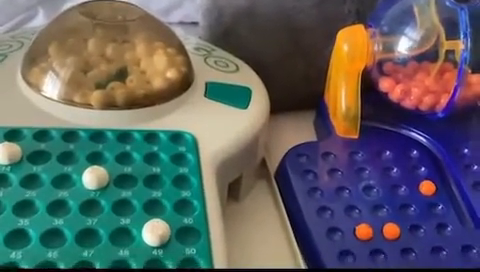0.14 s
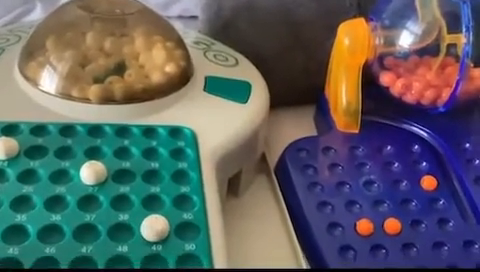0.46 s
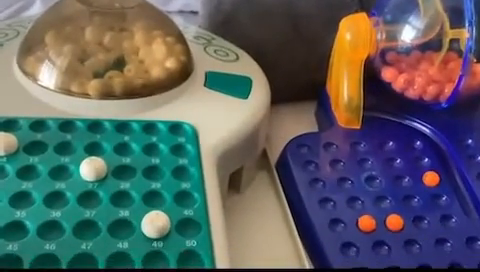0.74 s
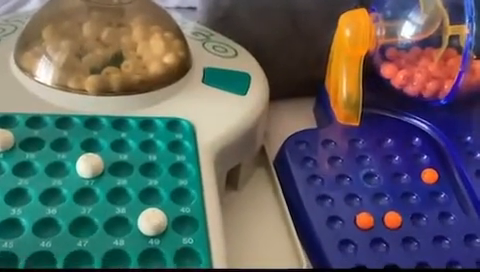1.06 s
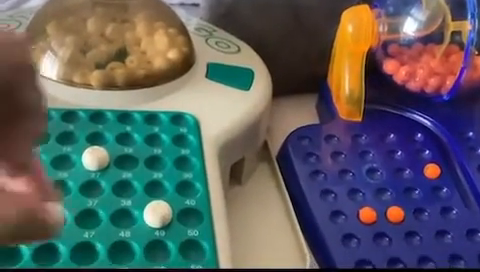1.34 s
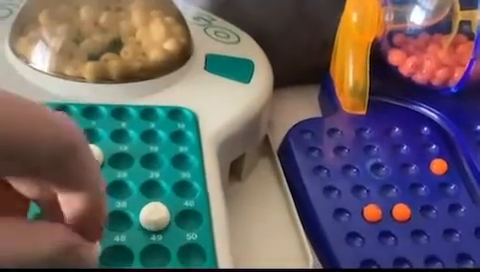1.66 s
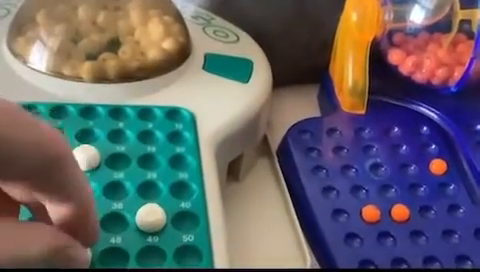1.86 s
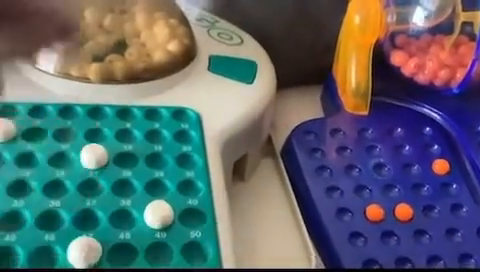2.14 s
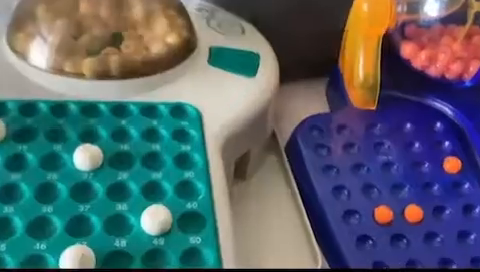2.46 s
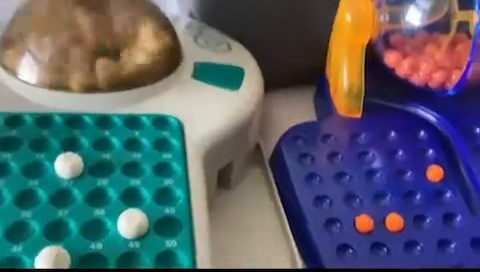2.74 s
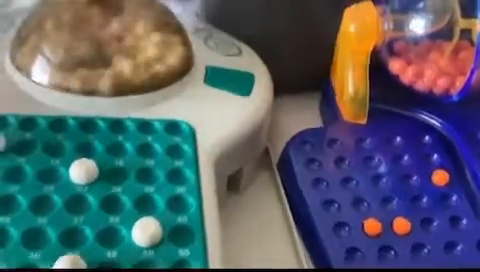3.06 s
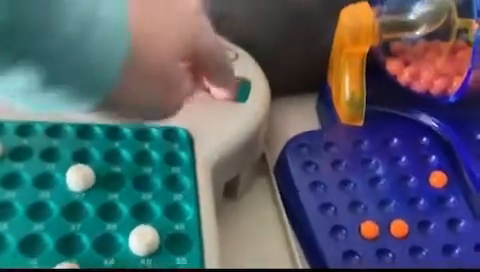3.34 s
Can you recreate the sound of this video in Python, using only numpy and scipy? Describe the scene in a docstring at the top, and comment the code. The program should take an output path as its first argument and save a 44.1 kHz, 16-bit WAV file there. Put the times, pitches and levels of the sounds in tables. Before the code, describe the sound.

A toy bingo machine's balls burst into a clattering rattle, following soft knocks and a dull tap

```python
"""A small room, the microphone close to a table with a plastic toy bingo machine on it.
Its mechanism knocks five times, a hand presses a ball into the tray, then the spring mixer snaps and
throws the balls round their dome. They rattle, settle, and the hand bumps the housing again.
Blows are bursts of damped noise, ringing modes and gliding thuds; random showers of them make the rattle.
Handling is shaped noise, and a short room echo and faint still air lie behind it all."""
import sys
import numpy as np
from scipy import signal
from scipy.fft import rfft, irfft
from scipy.io import wavfile

SR = 44100
rng = np.random.default_rng(int(sys.argv[2]) if len(sys.argv) > 2 else 0)


def wrap_up_sound(samples):
    """Save the sound to the file named by the first command line argument, as 16-bit audio."""
    columns = np.atleast_2d(samples).T
    # keep every value between -1 and 1, then stretch to whole-number steps
    tamed = np.clip(columns, -1, 1)
    steps = np.round(tamed * 32767).astype(np.int16)
    wavfile.write(sys.argv[1], SR, steps)


N = 154350  # 3.5 s
BLOW_SIZE = 12288  # samples in one blow
LEVEL_WINDOW_S = 0.01  # a blow's level is its RMS level as if spread over this time
BALL_DAMPING = 0.26  # how much sooner the highs die: exponent of decay time against frequency


# the mixer's spring lets go and chatters against its stop: (time [s], level of the crack [dB])
SPRING_BLOWS = [(2.6935, -19), (2.697, -13.5), (2.6994, -14.5), (2.706, -19.5)]
# colour of the spring's crack: (frequency [Hz], gain [dB])
SPRING_COLOUR = [(200, 3), (450, 1), (720, -8.5), (1100, 15), (1580, -13.5), (1900, -3.5), (2900, 1),
                 (4400, -5.5), (5200, -17), (7000, -17), (8500, -26.5), (15500, -35.5)]
# modes of the dome: (frequency [Hz], level [dB], decay time T60 [s])
DOME_MODES = [(290, -11, 0.27), (356.7, -4, 0.2), (428.3, -2.5, 0.1), (560.4, 0.5, .11), (1001, 1, 0.075),
              (1084, 1.5, 0.096), (1177, 1, 0.092), (1283, -6.5, 0.066), (1875, -11, 0.14),
              (2620, -13.5, 0.08), (2810, -6.5, 0.046), (3166, -10.5, 0.071), (3894, -10, 0.04)]


def snap():
    """The released mixer slams home in a few quick blows that ring the dome."""
    out = np.zeros(N)
    for time_s, level_db in SPRING_BLOWS:
        blow = crack(SPRING_COLOUR, t60_s=0.032, damping=BALL_DAMPING)
        dome = undb(-9) * ring(DOME_MODES, scatter_db=2.5)
        add(out, time_s, undb(level_db) * (blow + dome))
    return out


# colour of a ball's crack on plastic: (frequency [Hz], gain [dB])
BALL_COLOUR = [(120, -10), (220, 3.5), (380, 6), (580, 1), (760, -4.5), (1100, 9.5), (1330, -1.5),
               (1600, -15), (2050, -8.5), (3100, -7.5), (4300, -16.5), (5200, -25), (7000, -34.5),
               (8300, -45), (15500, -56)]


def ball_hit(tilt_db=0):
    """One ball on the dome: a crack, and modes whose pitch and mix depend on the spot struck."""
    pitch = 1 + 0.035 * rng.standard_normal()
    dome = ring(tilted(DOME_MODES, tilt_db), pitch, scatter_db=2)
    blow = crack(tilted(BALL_COLOUR, tilt_db), t60_s=0.035, damping=BALL_DAMPING)
    return unit(blow + undb(-4.5) * dome)


# tumbling of the loose balls: (time [s], level [dB])
TUMBLE_LEVEL = [(2.54, -46), (2.56, -41.5), (2.63, -47.5), (2.68, -38), (2.715, -22.5), (2.76, -27),
                (2.8, -20.5), (2.845, -18.5), (2.91, -24), (2.99, -31), (3.02, -27.5), (3.1, -35.5),
                (3.14, -48), (3.22, -52), (3.3, -57), (3.36, -48), (3.41, -58), (3.5, -61)]


def rattle(spots=24, hits_per_s=950):
    """A shower of random hits on many spots of the dome, swelling and dying as the balls settle."""
    out = np.zeros(N)
    for tilt_db in np.linspace(-1.2, 1.2, spots):  # dull to bright spots, dB per octave
        hits = shower(TUMBLE_LEVEL, hits_per_s / spots)
        out += signal.oaconvolve(hits, ball_hit(tilt_db))[:N]
    return out / np.sqrt(spots * LEVEL_WINDOW_S * SR)


# single balls striking plastic: (time [s], level [dB], tilt [dB per octave])
SINGLE_BALLS = [(2.5445, -36, -3.5), (2.587, -39.5, -0.5), (2.61, -41, -1), (2.652, -38, -2.5),
                (2.678, -35, 1), (2.686, -28, -5), (2.762, -27.5, 4.5), (2.772, -27.5, 6.5),
                (2.831, -24, 4.5), (2.909, -31, 3), (3.003, -32, -0.5), (3.1552, -30.5, 0),
                (3.159, -36, -2), (3.191, -37, 0.5), (3.255, -38, 1), (3.266, -37.5, -2),
                (3.273, -32.5, 0.5), (3.279, -35.5, -1), (3.327, -40, -5), (3.348, -39.5, -6),
                (3.4314, -39, -3.5), (3.466, -39, -0.5), (3.488, -41.5, -0.5)]


def clacks():
    """Single balls that stand out; each blow has its own brightness."""
    out = np.zeros(N)
    for time_s, level_db, tilt_db in SINGLE_BALLS:
        add(out, time_s, undb(level_db) * ball_hit(tilt_db))
    return out


# fine ticking of airborne balls against each other: (time [s], level [dB])
SPRAY_LEVEL = [(2.7, -35.5), (2.75, -47.5), (2.79, -38.5), (2.84, -35), (2.9, -37.5), (2.97, -57),
               (3.04, -47), (3.13, -73), (3.2, -95)]
# colour of those ticks: (frequency [Hz], gain [dB])
SPRAY_COLOUR = [(2000, -9), (2900, 7), (4300, 5), (5300, -4), (7000, -5), (8200, -16.5), (10000, -15.5),
                (13000, -27.5), (15500, -32)]


def spray(kinds=8, ticks_per_s=1100):
    """Balls in flight tick against each other so often that the ticks fuse into a bright crackle."""
    out = np.zeros(N)
    for _ in range(kinds):
        hits = shower(SPRAY_LEVEL, ticks_per_s / kinds)
        tick = crack(SPRAY_COLOUR, t60_s=0.028, damping=BALL_DAMPING)
        out += signal.oaconvolve(hits, tick)[:N]
    return out / np.sqrt(kinds * LEVEL_WINDOW_S * SR)


# last hard, bright ticks of plastic: (time [s], level [dB])
LAST_TICKS = [(3.466, -54), (3.488, -50)]
# modes of those ticks: (frequency [Hz], level [dB], decay time T60 [s])
TICK_MODES = [(3880, 8.5, 0.031), (4740, -4, 0.018), (8530, -0.5, 0.013)]


def ticks():
    """Hard plastic rings briefly in a few high modes."""
    out = np.zeros(N)
    for time_s, level_db in LAST_TICKS:
        add(out, time_s, undb(level_db) * ring(TICK_MODES))
    return out


# mechanism knocks: (time of the catch [s], catch level [dB], stop level [dB], housing ring level [dB])
MECHANISM_KNOCKS = [(0.2607, -43.5, -31.5, -31.5), (0.5021, -35, -36.5, -34), (0.6948, -37.5, -36.5, -34.5),
                    (0.8932, -33, -38.5, -33.5), (1.0698, -35, -40, -36.5)]
# colour of catch and stop: (frequency [Hz], gain [dB])
KNOCK_COLOUR = [(150, -11), (350, 5), (750, -1), (1150, 2), (1600, -11), (2300, -12), (3600, -20.5),
                (5500, -28), (7500, -30), (10000, -39.5), (15000, -69)]
# modes of the housing: (frequency [Hz], level [dB], decay time T60 [s])
HOUSING_MODES = [(89.4, -4.5, 0.18), (179.4, 9.5, 0.13), (315, 2, 0.11), (372, -4, 0.14), (462, 0, 0.025),
                 (530, 4, 0.06), (828, 0, 0.096), (1064, -3, 0.053), (1255, -5, 0.064), (2206, -5, 0.033)]


def knocks(stop_lag_s=0.0047):
    """The catch clicks; just after, the stop lands with a thud and rings the housing."""
    out = np.zeros(N)
    for time_s, catch_db, stop_db, housing_db in MECHANISM_KNOCKS:
        catch = crack(KNOCK_COLOUR, t60_s=0.082, damping=0.35)
        stop = crack(KNOCK_COLOUR, t60_s=0.082, damping=0.35)
        housing = ring(HOUSING_MODES, scatter_db=3.5) + undb(-1) * thud(centre_hz=186)
        add(out, time_s, undb(catch_db) * catch)
        add(out, time_s + stop_lag_s, undb(stop_db) * stop + undb(housing_db) * housing)
    return out


# soft bumps of hand and ball on the tray: (time [s], level of the thud [dB], thud centre [Hz])
SOFT_BUMPS = [(0.233, -57, 385), (0.364, -59, 328), (1.247, -58, 410), (1.618, -59.5, 696),
              (1.97, -48, 115), (2.048, -56, 340), (2.176, -45, 112.4), (2.316, -20, 293),
              (2.326, -27.5, 143), (2.336, -32, 320), (2.704, -22, 217), (3.224, -43.5, 187),
              (3.251, -29.5, 194), (3.266, -32.5, 150), (3.272, -37, 396)]
# modes of the tray: (frequency [Hz], level [dB], decay time T60 [s])
TRAY_MODES = [(118.8, -5, 0.15), (175.6, -10, 0.12), (264, 7.5, 0.023), (354.2, 17, 0.047),
              (359.4, 17.5, 0.046)]


def bumps():
    """Dull contacts thud and ring the hollow tray."""
    out = np.zeros(N)
    for time_s, level_db, centre_hz in SOFT_BUMPS:
        tray = undb(-2.5) * ring(TRAY_MODES, cut_hz=2 * centre_hz)
        add(out, time_s, undb(level_db) * (thud(centre_hz) + tray))
    return out


# a ball touches the tray, drops and rocks in its cup: (time [s], level [dB])
CUP_TAPS = [(1.842, -51), (1.8683, -39), (1.8719, -45), (2.378, -53)]
# colour of those taps: (frequency [Hz], gain [dB])
TAP_COLOUR = [(200, -2), (550, 0), (850, -1.5), (1130, 7.5), (1500, -17.5), (1950, -12), (3600, -27),
              (4600, -49), (10000, -55)]


def taps():
    """A ball clicks into its cup in the tray, short and dull."""
    out = np.zeros(N)
    for time_s, level_db in CUP_TAPS:
        add(out, time_s, undb(level_db) * crack(TAP_COLOUR, t60_s=0.062, damping=BALL_DAMPING))
    return out


# a fingertip judders on the tray: (time of the peak [s], length [s], peak level [dB])
FINGER_JUDDERS = [(1.675, 0.014, -49), (1.707, .03, -56), (1.727, 0.0091, -43)]


def judders(pitch_hz=270):
    """A fingertip sticks and slips in short low groans: a low tone swells and stops."""
    swell = np.zeros(N)
    for time_s, length_s, level_db in FINGER_JUDDERS:
        swell += undb(level_db) * hump(time_s, length_s)
    t = np.arange(N) / SR
    return swell * np.sqrt(2) * np.sin(2 * np.pi * pitch_hz * t)


# skin and ball scuffing over plastic:
# (time of the peak [s], length [s], peak level [dB], centre [Hz], width [octaves])
BRUSHES = [(0.362, 0.073, -62.5, 1120, 0.39), (1.384, 0.2, -66.5, 1370, 0.86),
           (1.646, 0.12, -66.5, 893, 0.28), (2.073, 0.27, -59.5, 504, 0.6), (2.02, 0.4, -75, 2380, 0.39),
           (2.327, 0.02, -39, 1050, 0.78), (2.35, 0.03, -47.5, 1240, 0.7), (2.41, 0.35, -60, 1090, 0.6)]


def brushes():
    """Fingers and ball brush the plastic: bands of noise that swell and fade."""
    out = np.zeros(N)
    for time_s, length_s, level_db, hz, octaves in BRUSHES:
        colour = [(hz / 4 ** octaves, -12), (hz, 0), (hz * 4 ** octaves, -18)]
        out += undb(level_db) * noise(colour) * hump(time_s, length_s)
    return out


# low handling rumble, before its unevenness: (time [s], level [dB])
RUMBLE_LEVEL = [(0, -84), (.15, -78), (.33, -58.5), (.47, -65), (.85, -71), (1.2, -65), (1.35, -64),
                (1.68, -59), (1.81, -74.5), (1.9, -60.5), (2.15, -63.5), (2.28, -64.5), (2.45, -61),
                (2.53, -53.5), (2.85, -41), (3.15, -59.5), (3.5, -55)]
# colour of the rumble: (frequency [Hz], gain [dB])
RUMBLE_COLOUR = [(35, -44), (61, -3), (136, 0.5), (205, 0.5), (457, -10), (700, -17), (910, -42)]


def rumble():
    """Fingers make the housing rumble: low noise whose level wanders at random, mostly at 4-25 Hz."""
    wander_db = 4.75 * noise([(4, 0.075), (25, 0.0096)])
    return noise(RUMBLE_COLOUR) * envelope(RUMBLE_LEVEL) * undb(wander_db)


# colour of the room's echo: (frequency [Hz], gain [dB])
ROOM_COLOUR = [(60, -22.5), (300, 9), (1000, 0), (3000, 10), (8000, 9.5), (15000, 13.5)]


def room_echo(toy):
    """The small room's dense echo builds up over some milliseconds, then dies away."""
    tail = crack(ROOM_COLOUR, t60_s=0.27, damping=0.15, size=32768)
    tail = tail * (1 - np.exp(-np.arange(len(tail)) / SR / 0.0088))  # build-up time in s
    tail = tail / np.sqrt(np.sum(tail ** 2))
    return undb(-14) * signal.oaconvolve(toy, tail)[:N]


# colour of the still air: (frequency [Hz], gain [dB])
AIR_COLOUR = [(18, 6), (30, -27), (182, -19), (315, -11), (359, 8.5), (561, -1), (2450, -8), (2800, -1),
              (3150, -9), (11300, -17), (15500, -23)]


def still_air():
    """The faint steady noise behind everything."""
    return undb(-77) * noise(AIR_COLOUR)


def crack(colour, t60_s, damping, size=BLOW_SIZE):
    """Countless overlapping modes: octave bands of noise, the higher ones dying sooner, then coloured."""
    hz, t = bins(size), np.arange(size) / SR
    spectrum = np.exp(2j * np.pi * rng.random(len(hz)))
    out = np.zeros(size)
    for octave in range(-4, 5):  # relative to 1 kHz, where t60_s holds
        band = np.maximum(1 - np.abs(np.log2(hz / 1000) - octave), 0)
        life_s = t60_s * 2 ** (-damping * octave)
        decay = np.exp(-np.log(1000) * t / life_s)
        out += irfft(spectrum * band, size) * decay / np.sqrt(life_s)
    # minimum phase: the colour filter is causal, so the attack stays sharp
    cepstrum = irfft(np.log(gains(colour, hz)), size)
    response = np.exp(rfft(2 * cepstrum[:size // 2], size))
    return unit(irfft(rfft(out) * response, size))


def ring(modes, pitch=1, scatter_db=0, cut_hz=np.inf):
    """Modes build up over about a cycle and decay; a soft contact (low cut_hz) spares the high ones."""
    hz, db, t60_s = np.array(modes, float).T[:, :, None]
    hz = hz * pitch
    t = np.arange(BLOW_SIZE) / SR
    size = undb(db + scatter_db * rng.standard_normal(hz.shape)) / (1 + (hz / cut_hz) ** 2)
    sign = (-1) ** np.arange(len(hz))[:, None]
    build_up = 1 - np.exp(-(t * hz / 0.98) ** 2)  # 0.98 cycles
    decay = np.exp(-np.log(1000) * t / t60_s)
    return unit(np.sum(sign * size * build_up * decay * np.sin(2 * np.pi * hz * t), axis=0))


def thud(centre_hz):
    """A bending wave in a plastic panel: the lows travel slower, so the pitch drops quickly."""
    ratio = bins(BLOW_SIZE) / centre_hz
    hump_of_band = np.exp(-0.5 * (np.log2(ratio) / 0.73) ** 2)  # width in octaves
    soft_contact = 1 / (1 + (ratio / 1.94) ** 4)  # cuts the top
    lag = np.exp(-2j * np.pi * 1.995 * np.log(ratio))  # delay of 1.995 cycles at each frequency
    wave = irfft(hump_of_band * soft_contact * lag)
    return unit(wave * (np.arange(BLOW_SIZE) < BLOW_SIZE // 2))


def shower(points, per_s, thinning=0.6):
    """Random hits that follow a level curve; as the level falls they also come more rarely."""
    strength = envelope(points)
    chance = per_s / SR * (strength / strength.max()) ** thinning
    size = undb(3 * np.clip(rng.standard_normal(N), -2, 2))  # spread of 3 dB
    hits = (rng.random(N) < chance) * size * strength
    return hits / np.sqrt(np.maximum(chance, 1e-12) * np.mean(size ** 2))  # fewer hits, each stronger


def tilted(table, tilt_db):
    """Brighten or dull (Hz, dB, ..) rows by so many dB per octave about 1 kHz, from 700 Hz to 9 kHz."""
    rows = []
    for hz, db, *rest in table:
        octaves = np.log2(np.clip(hz, 700, 9000) / 1000)
        rows.append((hz, db + tilt_db * octaves, *rest))
    return rows


def noise(colour):
    """Coloured noise of unit RMS level."""
    x = irfft(rfft(rng.standard_normal(N)) * gains(colour, bins(N)), N)
    return x / x.std()


def envelope(points):
    """Gain over time from (s, dB) points, silent before the first."""
    return undb(np.interp(np.arange(N) / SR, *np.array(points).T, left=-np.inf))


def hump(time_s, length_s):
    """A bell-shaped swell, down to 1/e half a length either side of its peak."""
    return np.exp(-(2 * (np.arange(N) / SR - time_s) / length_s) ** 2)


def gains(colour, hz):
    """Gain of a (Hz, dB) curve at given frequencies; beyond its ends it falls 20 dB per octave."""
    f, db = np.array(colour, float).T
    octaves_outside = np.abs(np.log2(hz / np.clip(hz, f[0], f[-1])))
    return undb(np.interp(np.log(hz), np.log(f), db) - 20 * octaves_outside)


def bins(size):
    """Frequencies of a transform in Hz, kept above zero."""
    return np.maximum(np.fft.rfftfreq(size, 1 / SR), 1)


def undb(db):
    """Decibels to gain."""
    return 10 ** (np.asarray(db) / 20)


def unit(x):
    """Scale a blow so that its energy equals unit level over the level window."""
    return x * np.sqrt(LEVEL_WINDOW_S * SR / np.sum(x ** 2))


def add(out, start_s, x):
    """Mix a sound in at a time."""
    i = int(start_s * SR)
    out[i:i + len(x)] += x[:max(N - i, 0)]


def scene():
    """The toy close by, its short room echo and faint still air."""
    balls = snap() + rattle() + clacks() + spray() + ticks()
    toy = balls + knocks() + bumps() + taps() + judders() + brushes() + rumble()
    return (toy + room_echo(toy) + still_air())[None]


def record(dry):
    """The sound is band-limited: next to nothing is kept above about 15.9 kHz."""
    band_limit = signal.ellip(10, 0.2, 70, 15900, fs=SR, output="sos")
    return signal.sosfilt(band_limit, dry)


dry = scene()
out = record(dry)
wrap_up_sound(out)
```